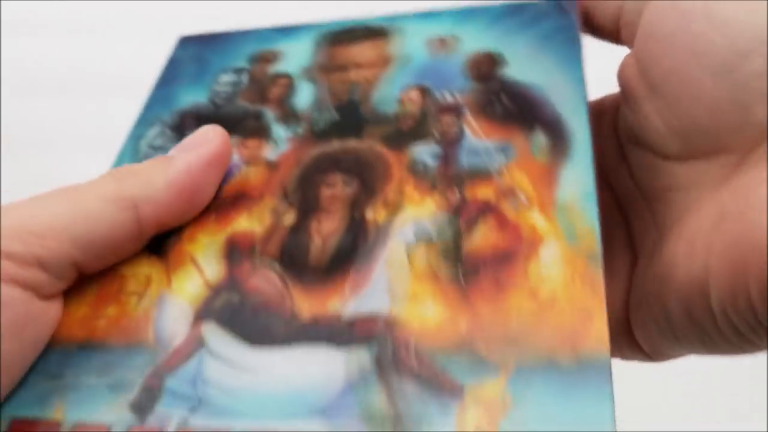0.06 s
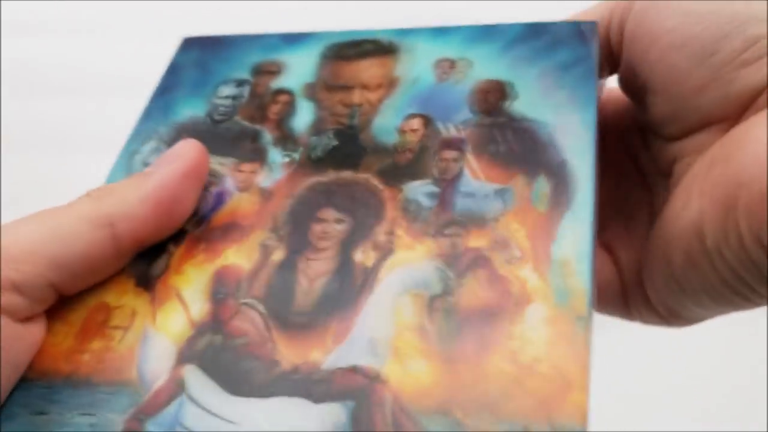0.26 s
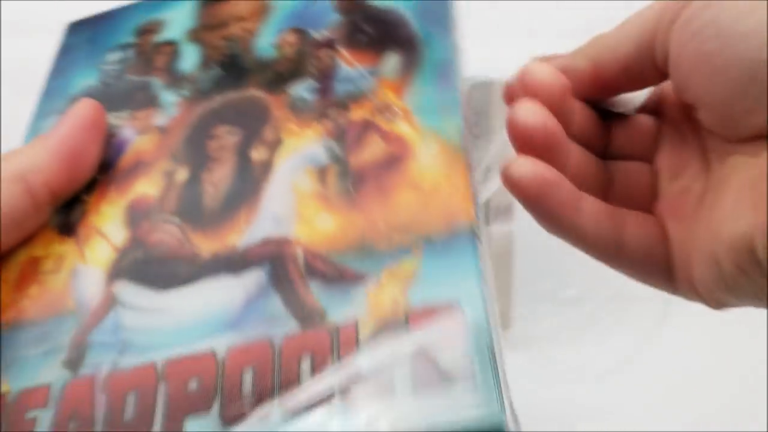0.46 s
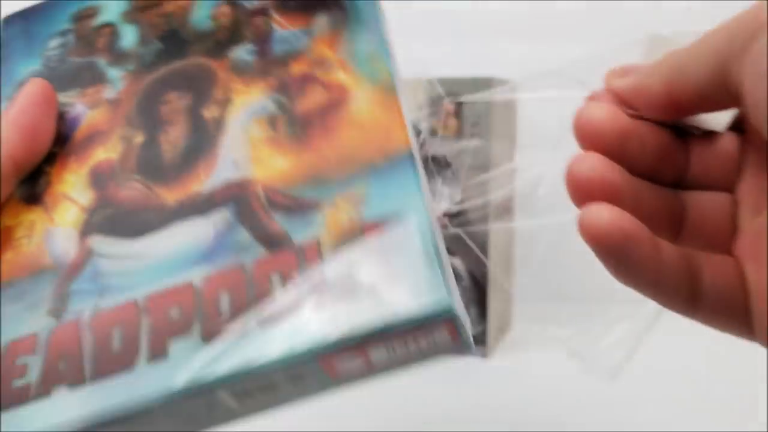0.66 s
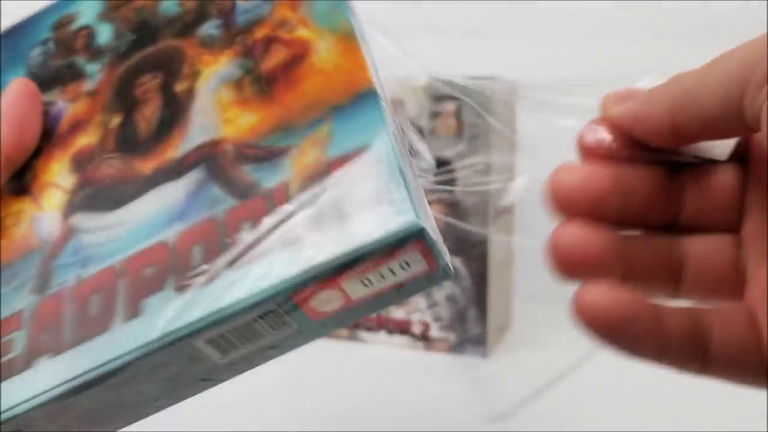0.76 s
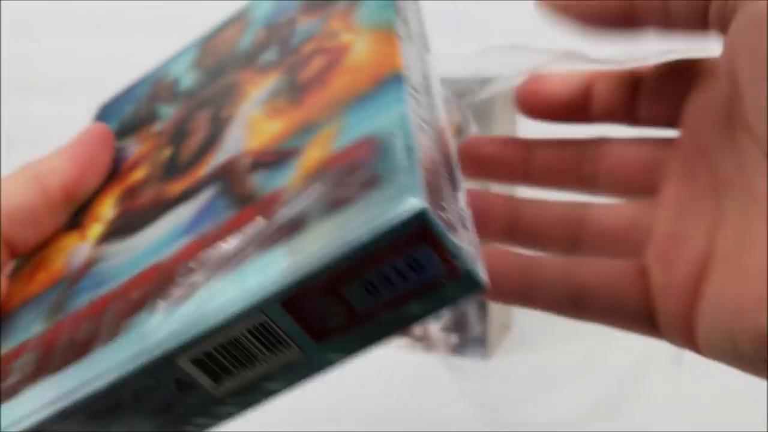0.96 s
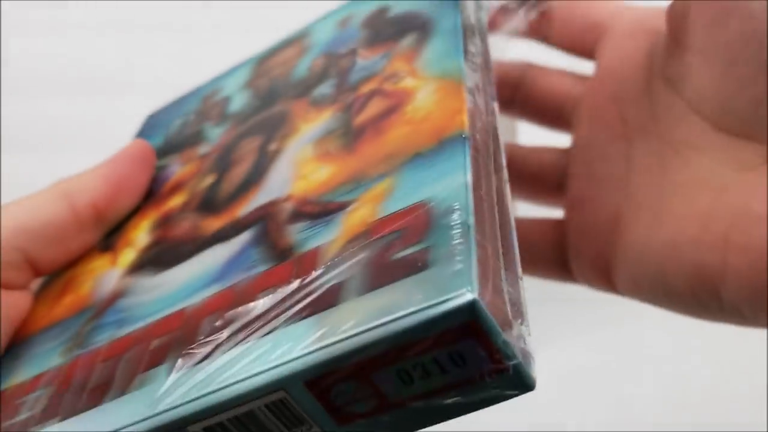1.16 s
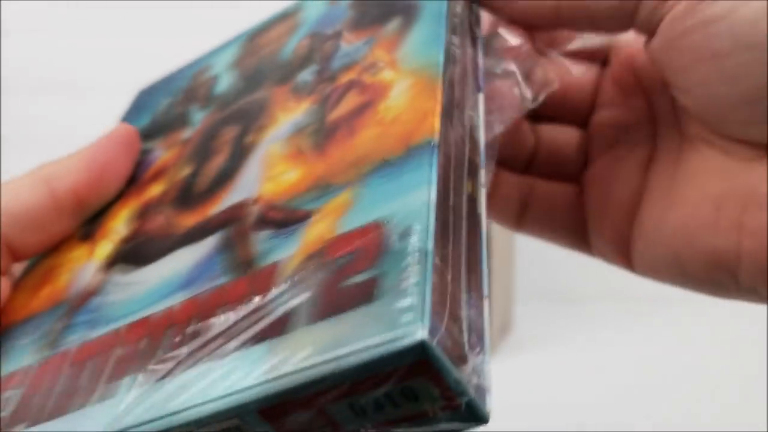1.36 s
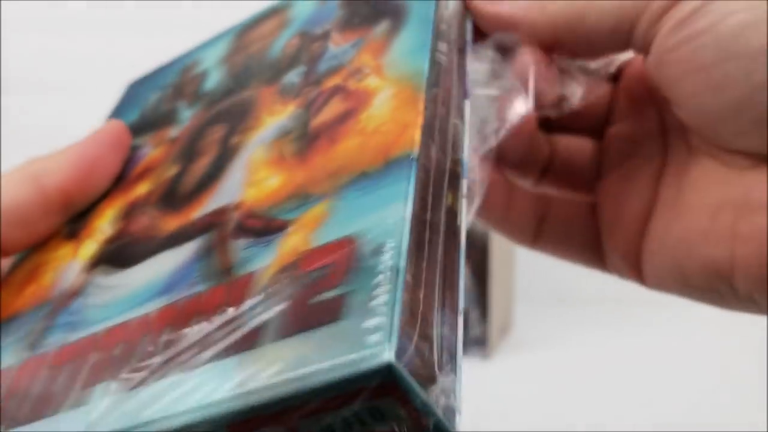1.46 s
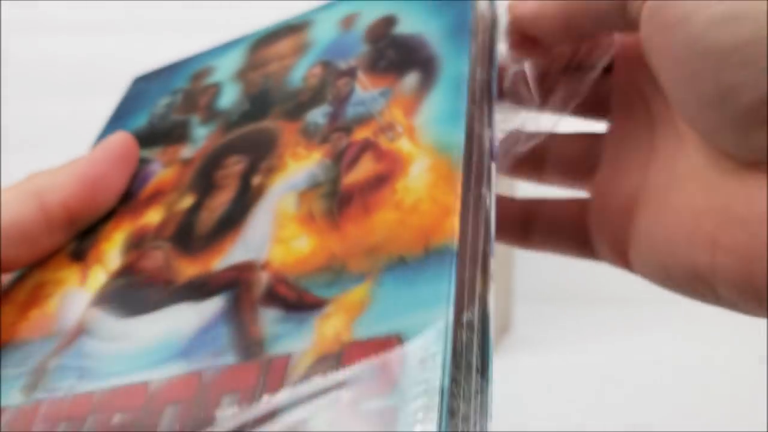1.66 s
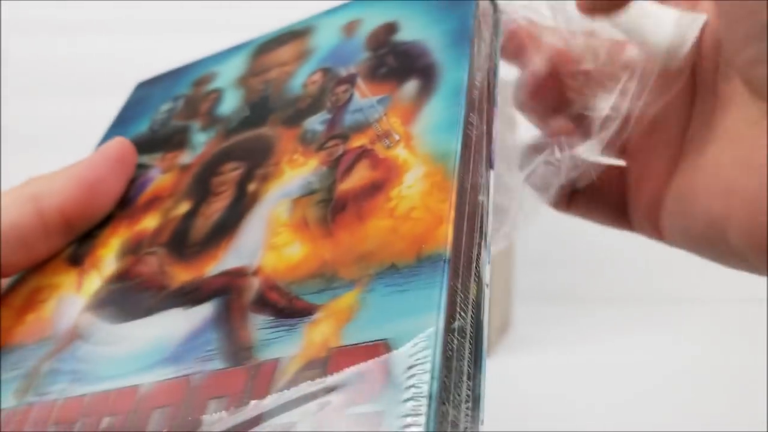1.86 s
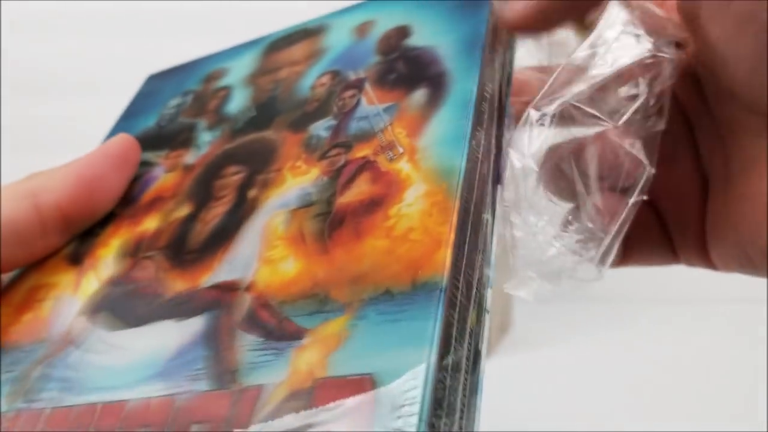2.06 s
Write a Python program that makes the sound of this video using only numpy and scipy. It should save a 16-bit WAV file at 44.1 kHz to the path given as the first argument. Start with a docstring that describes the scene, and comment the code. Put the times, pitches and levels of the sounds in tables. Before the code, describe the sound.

Thin plastic shrink wrap snaps loose from a flat case in two bursts, then crinkles

```python
"""Shrink wrap pulled off a flat case

Close up in a small room, stretched film gives way in two runs of sharp snaps that knock the case.
Then the loose film is gathered up, crinkling and ticking, while hands bump softly on the case.
Snaps and ticks are short noise cracks that ring the film; crinkling is many tiny cracks over a hiss.
The hands make rounded low thuds and a dull rub. The case adds a knock and a hollow ring,
and short echoes surround the film and the case."""
import sys
import numpy as np
from scipy import signal
from scipy.fft import rfft, irfft, next_fast_len
from scipy.io import wavfile
from scipy.ndimage import map_coordinates

SR = 44100
rng = np.random.default_rng(int(sys.argv[2]) if len(sys.argv) > 2 else 0)


def inscribe(sig):
    """Save sig as 16-bit PCM at rate SR to the path in sys.argv[1].

    A 1-D sig is mono; a 2-D sig holds one channel per row.
    Samples are clipped to [-1, 1] before scaling.
    """
    pcm = np.round(np.clip(np.atleast_2d(sig).T, -1, 1) * 32767)
    wavfile.write(sys.argv[1], SR, pcm.astype(np.int16))


N = 92610  # length of the scene, in samples

# tone colour of the loose film: (frequency [Hz], relative level [dB])
FILM_TONE = [(200, -21), (900, -14), (2000, -3.5), (5800, -0.5), (7500, 1), (8800, -5), (12500, 4.5),
             (16000, -1.5)]


def amp(db):
    """Turns decibels into a gain."""
    return 10 ** (np.asarray(db) / 20)


def unit(x):
    """Scales a sound to an rms of 1."""
    return x / np.sqrt(np.mean(x ** 2) + 1e-20)


def along(points, hz):
    """Reads a curve of (frequency, value) points on a logarithmic frequency axis."""
    f, v = np.transpose(points)
    return np.interp(np.log(hz + 1), np.log(f + 1), v)


def filtered(x, response):
    """Multiplies the spectrum of x by a response that depends on frequency."""
    padded = next_fast_len(N + SR // 2)
    hz = np.fft.rfftfreq(padded, 1 / SR)
    return irfft(rfft(x, padded) * response(hz), padded)[..., :N]


def convolved(x, kernel):
    """Convolves each channel with its kernel and keeps the length of the scene."""
    return signal.fftconvolve(x, np.atleast_2d(kernel), axes=1)[:, :N]


def coloured(x, points, size=4096):
    """Gives x a tone colour without pre-echo; white noise would keep its power."""
    hz = np.fft.rfftfreq(size, 1 / SR)
    cepstrum = irfft(np.log(unit(amp(along(points, hz)))))
    # folding the cepstrum gives a minimum-phase filter, which only acts after the sound
    cepstrum[1:size // 2] *= 2
    cepstrum[size // 2 + 1:] = 0
    return convolved(x, irfft(np.exp(rfft(cepstrum))))


def resonance(x, hz, q):
    """One damped resonance; a higher q rings longer."""
    b, a = signal.iirpeak(hz, q, SR)
    return signal.lfilter(b, a, x)


def wobble(rate):
    """A smooth random curve through a given number of random points per second."""
    points = rng.standard_normal(int(N * rate / SR) + 2)
    return map_coordinates(points, [np.arange(N) * rate / SR])


def burst(decay, size=2048, count=4):
    """A dying noise crack with a nearly even spectrum and energy 1 in each of two channels."""
    rise_s = 0.00042
    t = np.arange(1, size + 1) / SR
    fade = amp(-60 * t / decay) * (1 - np.exp(-t / rise_s))
    x = rng.standard_normal((2, size)) * fade
    for _ in range(count):
        flat = irfft(np.exp(1j * np.angle(rfft(x))))  # same phases, even spectrum
        x = flat * np.sqrt(fade)
    return x / np.linalg.norm(x, axis=1, keepdims=True)


def ringing(decay, hz, ring_db, q):
    """A crack that rings a patch of film at one pitch."""
    crack = burst(decay)
    return crack + amp(ring_db) * resonance(crack, hz, q)


def add(out, s, db, sound):
    """Places a short sound at time s; db is its rms level if its energy is spread over 10 ms."""
    part = out[:, int(s * SR):][:, :sound.shape[1]]
    scaled = sound * amp(db) * np.sqrt(2 * SR / 100) / np.linalg.norm(sound)
    part += scaled[:, :part.shape[1]]


def quiet_floor():
    """A steady, faint background of coloured noise."""
    # (frequency [Hz], relative level [dB])
    floor_tone = [(20, -11.5), (80, 1), (200, -10), (600, -35.5), (4000, -15.5), (16000, -31)]
    return amp(-70.5) * unit(coloured(rng.standard_normal((2, N)), floor_tone))


def grip():
    """The case shifts in the hand: a low noisy rub whose pitch mostly sinks as the film lets go."""
    # course of the rub: (time [s], relative level [dB], centre pitch [Hz])
    rub_course = [(0.38, -82, 300.4), (0.42, -53.5, 242), (0.457, -50, 210.4), (0.486, -70, 120.6),
                  (0.55, -67, 79.5), (0.585, -54.5, 139.2), (0.65, -62, 128.7), (0.75, -76, 107),
                  (0.785, -110, 90)]
    wobble_rate = 130  # random points per second; more makes the rub less like a tone
    s, db, hz = np.transpose(rub_course)
    t = np.arange(N) / SR
    phase = 2 * np.pi * np.cumsum(np.interp(t, s, hz)) / SR
    rub = [wobble(wobble_rate) * np.cos(phase) + wobble(wobble_rate) * np.sin(phase) for _ in range(2)]
    return amp(np.interp(t, s, db)) * np.array(rub)


def hands():
    """Fingers and palm bump the case with dull thuds: low resonant noise under a rounded swell."""
    # soft bumps: (time of the middle [s], level [dB], pitch [Hz])
    bumps = [(0.302, -60, 295), (0.468, -57.5, 84.5), (0.505, -52.5, 151), (1.332, -61.5, 196),
             (1.356, -60.5, 86), (1.704, -56.5, 235), (1.769, -59.5, 150), (1.947, -64.5, 186)]
    width_s, q = 0.014, 1
    t = np.arange(N) / SR
    out = np.zeros((2, N))
    for s, db, hz in bumps:
        bell = np.exp(-((t - s) / width_s) ** 2 / 2)
        low_noise = resonance(resonance(rng.standard_normal((2, N)), hz, q), hz, q)
        thud = bell * low_noise
        # each thud gets the energy of its swell
        out += amp(db) * thud * np.linalg.norm(bell) / np.linalg.norm(thud, axis=1, keepdims=True)
    return out


def grains(low_hz, high_hz, count=16):
    """Many small facets buckle in random clusters, each at one of several pitches, over a rustle."""
    grains_per_s, spread_db = 1500, 5  # grains of all pitches together; random size of each
    clusters_per_s, cluster_db, facet_drift_db = 90, 2, 3.5  # rate and depths of the level wobble
    ring_db, rustle_db = 9.5, -7
    out = np.zeros((2, N))
    for hz in np.geomspace(low_hz, high_hz, count):
        spread = spread_db * np.clip(rng.standard_normal(N), -2, 2)
        size = amp(spread + facet_drift_db * wobble(clusters_per_s))
        hits = size * (rng.random(N) < grains_per_s / count / SR)
        crack = ringing(0.0026, hz, ring_db, q=4.25)
        out += convolved(np.array([hits, hits]), crack)
    clustered = unit(out * amp(cluster_db * wobble(clusters_per_s)))
    return clustered + amp(rustle_db) * rng.standard_normal((2, N))


def crinkling():
    """Every stroke of the hand crinkles the film and drags it over the case."""
    # pulls and squeezes: (time [s], length [s], relative crinkle level [dB],
    # relative level of the rubbing on the case [dB])
    strokes = [(0, 0.39, -50.5, -69.5), (0.122, 0.029, -47, -54.5), (0.211, 0.22, -45, -53.5),
               (0.387, 0.047, -40, -44.5), (0.566, 0.013, -55.5, -57), (0.628, 0.029, -33, -52),
               (0.74, 0.084, -55.5, -75.5), (0.882, 0.051, -54, -65), (1.033, 0.069, -59.5, -86),
               (1.151, 0.0093, -52.5, -69.5), (1.202, 0.066, -59.5, -74), (1.253, 0.018, -51, -67.5),
               (1.287, 0.16, -46.5, -57), (1.322, 0.0079, -49.5, -50), (1.472, 0.23, -58, -70.5),
               (1.642, 0.03, -41, -58.5), (1.684, 0.033, -43, -53.5), (1.744, 0.0034, -41, -50.5),
               (1.785, 0.091, -48, -55), (1.918, 0.022, -45, -53.5), (2.044, 0.13, -46, -59)]
    rise_share, release_s = 0.49, 0.041  # rise as a share of the length; dying away afterwards
    knock_db = -4.5
    t = np.arange(N) / SR
    crinkle, rub = np.zeros((2, N))
    for s, length, crinkle_db, rub_db in strokes:
        rise = np.clip((t - s) / (rise_share * length) + .5, 0, 1)
        shape = rise * np.exp(-np.maximum(t - s - length, 0) / release_s)
        # where strokes overlap, the stronger one counts
        crinkle = np.maximum(crinkle, amp(crinkle_db) * shape)
        rub = np.maximum(rub, amp(rub_db) * shape)
    film = coloured(crinkle * grains(2100, 12800), FILM_TONE)
    push = amp(knock_db) * rub * grains(592, 2560, count=6)
    return film, push


def popping():
    """Single creases flip over in the slack film, each at its own pitch, and faintly knock the case."""
    # popping creases: (time [s], relative level [dB], pitch of the crease [Hz])
    creases = [(0.108, -34.5, 6500), (0.1478, -38, 3460), (0.238, -33.5, 11100), (0.278, -45, 12600),
               (0.3478, -39.5, 12100), (0.8232, -43.5, 4400), (0.8508, -48, 2890), (0.8644, -40.5, 13000),
               (0.8922, -35.5, 2500), (0.941, -36.5, 3840), (0.9886, -37, 1930), (1.0575, -49, 11800),
               (1.067, -43.5, 4470), (1.0903, -47, 7400), (1.1637, -47.5, 6800), (1.2958, -37, 3500),
               (1.3172, -33.5, 4060), (1.416, -37, 2040), (1.4406, -31, 2130), (1.4811, -36, 7900),
               (1.519, -48.5, 7140), (1.5343, -47, 2610), (1.6095, -41, 1900), (1.7036, -31.5, 3700),
               (1.8104, -34.5, 3500), (1.8447, -33.5, 11900), (1.9041, -37, 3040), (1.9735, -36, 2820),
               (1.9804, -39.5, 6200), (2.0141, -39, 7600)]
    pop_db, knock_db = -9, -22.5  # shift of all pops; push on the case, relative to the pops
    film = np.zeros((2, N))
    for s, db, hz in creases:
        add(film, s, db + pop_db, ringing(0.0058, hz, ring_db=10, q=4.5))
    return coloured(film, FILM_TONE), amp(knock_db) * film


def tearing():
    """Each snap cracks a flap free, and twangs the taut film against the case for a few cycles."""
    # snaps: (time [s], crack level before colouring [dB], push on the case before its answer [dB],
    # decay setting [s], pitch of the taut film [Hz], pitch of the freed flap [Hz])
    snaps = [(0.3579, -38, -48, 0.0056, 1900, 12000), (0.369, -36.5, -43.5, 0.02, 1550, 12800),
             (0.3801, -34, -34.5, 0.0046, 1800, 13000), (0.3903, -30, -35, 0.0051, 1920, 7300),
             (0.4105, -36, -37.5, 0.0088, 1610, 7000), (0.4183, -29, -40.5, 0.0084, 750, 4000),
             (0.4245, -40, -40.5, 0.0069, 590, 5800), (0.4309, -35, -55, 0.029, 1500, 4100),
             (0.4348, -32.5, -40.5, 0.057, 690, 4500), (0.4441, -32.5, -35.5, 0.0072, 2170, 5500),
             (0.4508, -37.5, -37.5, 0.014, 2300, 12300), (0.456, -34.5, -53, 0.013, 706, 4400),
             (0.598, -53, -45.5, 0.031, 750, 6000), (0.6025, -55, -55, 0.013, 706, 6000),
             (0.6253, -32.5, -32.5, 0.018, 1210, 11000), (0.6278, -29.5, -42.5, 0.022, 1260, 7460),
             (0.6446, -27, -47, 0.0095, 1250, 4600), (0.6557, -32.5, -39, 0.0058, 616, 5000),
             (0.6645, -31.5, -59, 0.025, 600, 6700), (0.673, -33, -43, 0.03, 610, 12300),
             (0.706, -28, -38, 0.02, 2870, 6300), (0.712, -27.5, -46.5, 0.034, 930, 5300)]
    # tone colour of the cracks: (frequency [Hz], relative level [dB])
    snap_tone = [(300, -7), (1200, -15), (2500, 8), (4500, 6.5), (7400, 8), (9000, 3.5), (12500, 11),
                 (16000, 3.5)]
    film, push = np.zeros((2, 2, N))
    for s, crack_db, knock_db, decay, taut_hz, flap_hz in snaps:
        add(film, s, crack_db, ringing(decay, flap_hz, ring_db=6, q=5))
        add(push, s, knock_db, ringing(decay, taut_hz, ring_db=6, q=3.9))
    return coloured(film, snap_tone), push


def case(push):
    """The case answers every push with a knock and a short hollow ring of several dying tones."""
    # tones of the case: (frequency [Hz], relative level [dB])
    case_tones = [(595, -11.5), (700, -14), (1430, 7.5), (1770, -15), (1830, 0.5), (1950, 4)]
    # tone colour of the knock: (frequency [Hz], relative level [dB])
    knock_tone = [(70, -24.5), (190, 2), (380, -0.5), (630, 7), (1050, 0.5), (1400, 3), (1850, 5),
                  (2400, -4), (5000, 5), (16000, -51.5)]
    ring_db, t60 = -16, 0.12  # t60: time to fade by 60 dB [s]
    t = np.arange(SR // 2) / SR
    ring = sum(amp(db - 60 * t / t60) * np.sin(2 * np.pi * hz * t) for hz, db in case_tones)
    knock = coloured(push, knock_tone)
    return knock + amp(ring_db) * convolved(push, ring / np.linalg.norm(ring))


def room(x):
    """Quick reflections from table and hands, with the short tail of the room."""
    # fading of the tail: (frequency [Hz], time to fade by 60 dB [s])
    tail_fading = [(150, 0.4), (550, 0.22), (1400, 0.082), (4000, 0.2), (15000, 0.069)]
    tail_db, table_db, table_t60, gap_s = -10.5, -9.5, 0.0092, .002
    hz, t, z = signal.stft(rng.standard_normal((2, SR // 2)), SR, nperseg=256)
    fade = amp(-60 * t / along(tail_fading, hz)[:, None])
    tail = signal.istft(z * fade, SR, nperseg=256)[1]
    # cubing the noise leaves a few strong reflections among many weak ones
    table_fade = amp(-60 * np.arange(tail.shape[1]) / SR / table_t60)
    early = rng.standard_normal(tail.shape) ** 3 * table_fade
    parts = [(tail_db, tail), (table_db, early)]
    answer = sum(amp(db) * r / np.linalg.norm(r, axis=1, keepdims=True) for db, r in parts)
    return convolved(x, np.pad(answer, ((0, 0), (int(gap_s * SR), 0))))


def alternating_room(x, count=4):
    """Four random echo patterns take turns every 1024 samples, so the tail sounds less tonal."""
    turn = np.arange(N) // 1024 % count
    return sum(room(x * (turn == k)) for k in range(count))


def ports(pair):
    """Two microphone ports: much alike in the bass, nearly unrelated in the treble, the left a little late."""
    # (frequency [Hz], left-right likeness [0 to 1])
    likeness = [(200, 0.83), (1400, 0.6), (5000, 0.03)]
    # (frequency [Hz], left over right [dB])
    left_over_right = [(100, 0.5), (1300, 2.5), (3000, 1.5), (9000, -0.5)]
    left_lag_s = .00002

    def shares(hz):
        angle = np.arccos(np.clip(along(likeness, hz), -1, 1)) / 2
        return np.array([np.cos(angle), np.sin(angle)])

    def lean(hz):
        # half of the level difference and lag on the left, the opposite half on the right
        left = amp(along(left_over_right, hz) / 2) * np.exp(-1j * np.pi * hz * left_lag_s)
        return np.array([left, 1 / left])

    mid, side = filtered(pair, shares)
    return filtered(np.array([mid + side, mid - side]), lean)


def scene():
    """Film, case and hands in a quiet room."""
    films, pushes = zip(crinkling(), popping(), tearing())
    near = sum(films) + case(sum(pushes))
    return ports(quiet_floor() + grip() + hands() + near + alternating_room(near))


def record(dry):
    """The recorder keeps nothing above its band limit of 16050 Hz."""
    return filtered(dry, lambda hz: hz < 16050)


dry = scene()
out = record(dry)
inscribe(out)
```